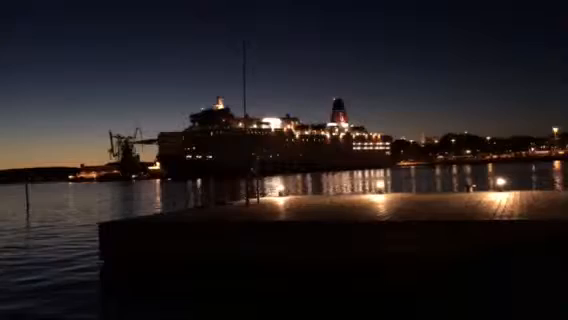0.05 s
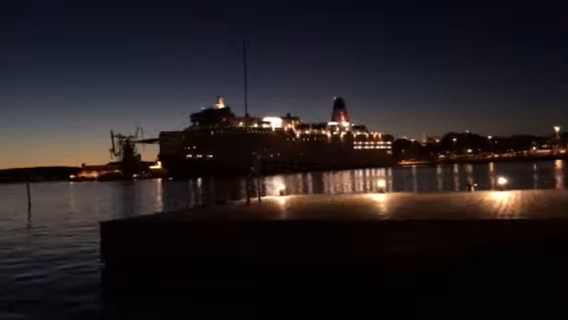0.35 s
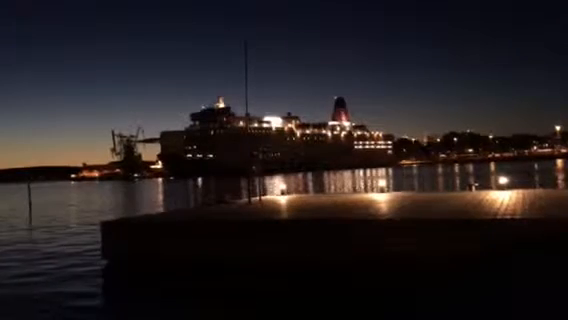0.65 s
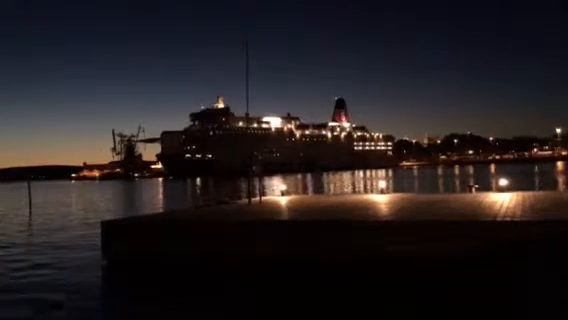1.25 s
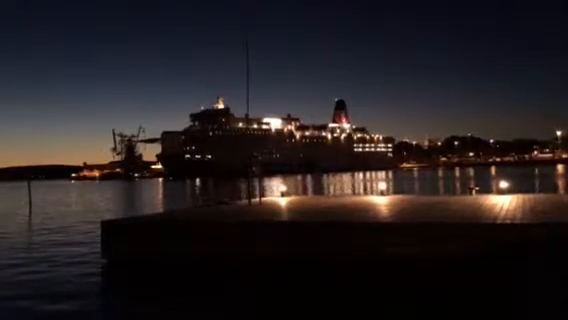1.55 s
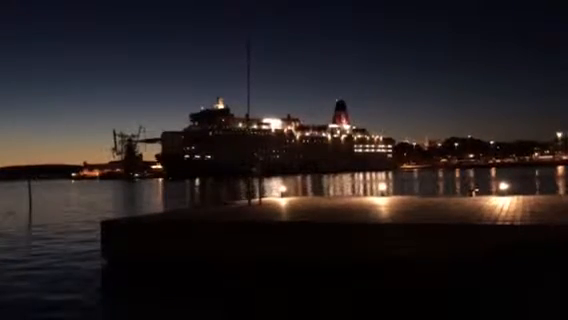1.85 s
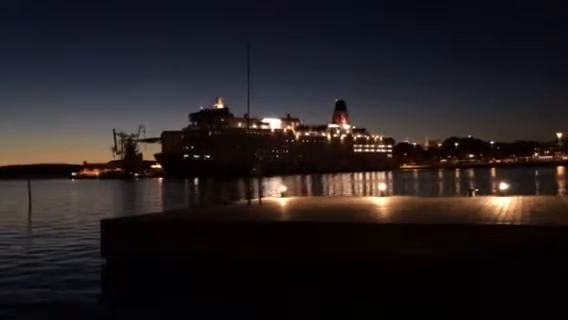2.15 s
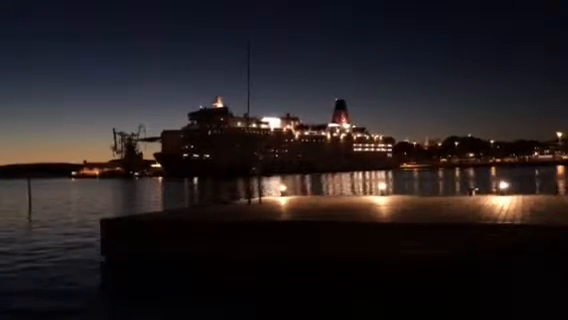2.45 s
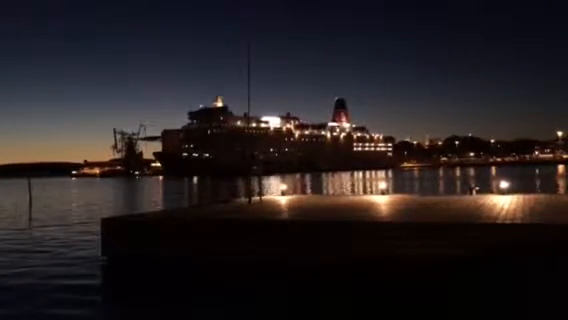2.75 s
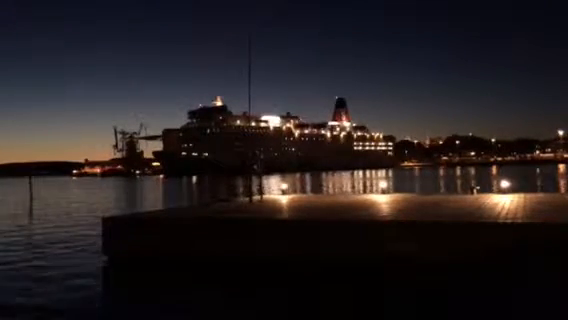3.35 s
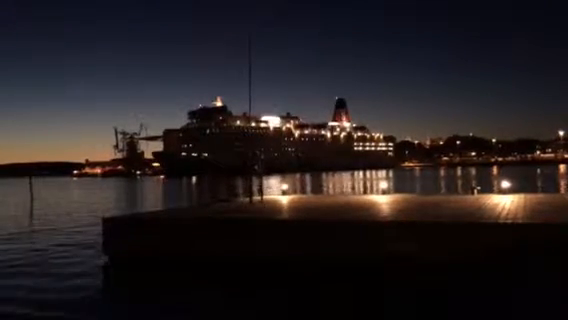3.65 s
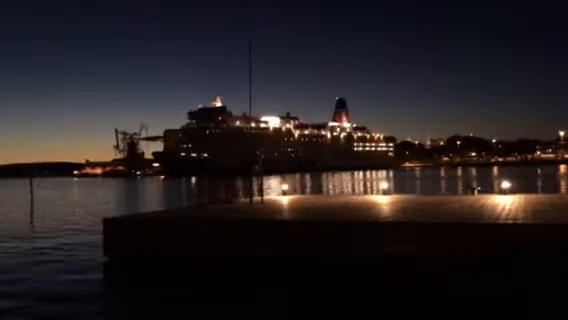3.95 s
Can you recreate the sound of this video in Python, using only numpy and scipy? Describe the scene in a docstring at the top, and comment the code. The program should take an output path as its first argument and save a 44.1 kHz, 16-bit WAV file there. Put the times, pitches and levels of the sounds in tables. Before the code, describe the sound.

An idling ship's engines rumble and pulse steadily across the harbor, picked up from the dockside. Behind them sit a distant ventilation roar and faint wavering whines, with a light wash of wind and water and a few tiny ticks nearby.

```python
"""Ferry idling in a night harbour

Heard from the quay, two diesels sound harmonics of their firing cycles, which beat against each
other over a throbbing exhaust rumble. Ventilation fans hum and machines whine in a distant roar.
An airy wash of breeze and water swells and sinks, with three tiny ticks nearby and microphone hiss."""
import sys
import numpy as np
from scipy import signal
from scipy.fft import irfft
from scipy.io import wavfile

SR = 44100
rng = np.random.default_rng(int(sys.argv[2]) if len(sys.argv) > 2 else 0)


def output_pcm(signal):
    """Save a mono or channel-first signal as 16-bit PCM at the path in sys.argv[1].

    Samples are clipped to [-1, 1] before scaling.
    """
    pcm = np.clip(np.atleast_2d(signal).T, -1, 1) * 32767
    wavfile.write(sys.argv[1], SR, np.round(pcm).astype(np.int16))


N = 176400


def amp(db):
    """Amplitude ratio: tenfold for every 20 dB."""
    return 10 ** (np.asarray(db) / 20)


def unit(x):
    """Normalisation to rms 1."""
    return x / np.sqrt(np.mean(x ** 2) + 1e-30)


def level(points):
    """Gain envelope, interpolated between points of time in seconds and level in dB."""
    return amp(np.interp(np.arange(N) / SR, *np.transpose(points)))


def noise(gain_at):
    """Random-phase synthesis: noise of rms 1 with the given amplitude spectrum."""
    hz = np.fft.rfftfreq(N, 1 / SR)
    return unit(irfft(gain_at(hz) * np.exp(2j * np.pi * rng.random(len(hz))), N))


def coloured(points):
    """Spectral shaping: noise of rms 1 from points of frequency in Hz and relative density in dB."""
    f, db = np.transpose(points)
    return noise(lambda hz: amp(np.interp(np.log(hz + 1), np.log(f + 1), db)))


def drift(rate_hz):
    """Low-pass noise: a slow random wander of rms 1."""
    return noise(lambda hz: (hz > 0) * np.exp(-(hz / rate_hz) ** 2))


def rotation(hz, wander, rate_hz):
    """Phase as the integral of a frequency that strays by the rms fraction `wander`."""
    return 2 * np.pi * np.cumsum(hz * (1 + wander * drift(rate_hz))) / SR


def tone(phase, order):
    """Harmonic of rms 1 at a whole multiple of the cycle rate."""
    return np.sqrt(2) * np.cos(order * phase + 2 * np.pi * rng.random())


def exhaust(phase, orders):
    """Harmonic series of periodic exhaust pulses, each partial fading slightly over the water."""
    fading_db = -0.5
    return sum(amp(db) * unit(tone(phase, order) * amp(fading_db * drift(rate_hz=1.3)))
               for order, db in orders.items())


def diesels():
    """Beating: close harmonics of a slow diesel and a faster generator, whose governors hunt slightly."""
    # Exhaust tones of each engine. Each entry: multiple of the cycle rate, level in dB.
    main_orders = {11: -54, 12: -50.5, 15: -55, 17: -52, 18: -48, 33: -57, 49: -61}
    generator_orders = {6: -60, 7: -49.5, 10: -48.5, 12: -47.5, 13: -48.5, 15: -58, 18: -56, 27: -56}
    # The slow diesel's strongest tone. Each row: time in seconds, level in dB.
    boom_level = [(0, -40), (.3, -37.5), (.55, -45), (.75, -47), (.9, -40), (1.2, -42), (1.4, -38),
                  (1.8, -37), (2.15, -37), (2.8, -38), (3.3, -40.5), (3.65, -44), (4, -52)]
    main = rotation(hz=4.035, wander=.0012, rate_hz=.53)
    generator = rotation(hz=6.3, wander=.0012, rate_hz=.53)
    boom = level(boom_level) * tone(main, order=13)
    return boom + exhaust(main, main_orders) + exhaust(generator, generator_orders)


def rumble():
    """Band-limited noise: a deep, steady exhaust rumble under a hollow, surging drone."""
    # Spectra of the two bands. Each row: frequency in Hz, relative density in dB.
    rumble_spectrum = [(10, -25), (24, -18), (33, -19), (42, -6), (56, 0), (76, 0), (87, -4.5), (110, -8),
                       (135, -16), (200, -42), (1500, -110)]
    drone_spectrum = [(40, -43), (75, -17.5), (92, -2), (110, 1), (132, -2), (153, -3), (180, -3.5),
                      (215, -8), (250, -19.5), (400, -29.5), (3000, -100)]
    # Their envelopes. Each row: time in seconds, level in dB.
    rumble_level = [(0, -43), (2.8, -43), (3.1, -42), (4, -42)]
    drone_level = [(0, -48), (.2, -40), (.45, -42.5), (.78, -41), (1.16, -44), (1.32, -41.5), (1.47, -42.5),
                   (1.63, -39), (1.88, -44), (2.12, -38), (2.42, -42), (2.63, -39.5), (2.9, -43.5),
                   (3.15, -40), (3.35, -40), (3.55, -41), (3.77, -38.5), (4, -40.5)]
    return level(rumble_level) * coloured(rumble_spectrum) + level(drone_level) * coloured(drone_spectrum)


def throbs():
    """Amplitude modulation: deep exhaust noise swells in short half-cosine pulses."""
    # Exhaust throbs. Each row: centre in seconds, length in seconds, level at the crest in dB.
    pulses = [(.04, .09, -37), (.155, .09, -33.5), (.27, .1, -36), (.365, .09, -36), (.59, .16, -35.5),
              (.795, .09, -34.5), (.88, .08, -33.5), (.99, .11, -34.5), (1.275, .08, -32.5),
              (1.33, .1, -33), (1.405, .07, -32.5), (1.52, .11, -35), (1.68, .11, -32.5), (1.9, .09, -35),
              (2.14, .12, -32), (2.34, .07, -33), (2.5, .09, -31.5), (2.78, .08, -37), (2.885, .1, -34),
              (3.255, .05, -31.5)]
    # Their spectrum. Each row: frequency in Hz, relative density in dB.
    spectrum = [(10, -45), (35, -25), (46, -6), (58, 0), (76, 0), (88, -7), (125, -16), (180, -24),
                (260, -48), (1500, -110)]
    out, exhaust_noise = np.zeros(N), coloured(spectrum)
    for centre, length, db in pulses:
        swell = np.cos(np.pi * np.clip((np.arange(N) / SR - centre) / length, -.5, .5))
        out += amp(db) * unit(swell * exhaust_noise) * np.sqrt(np.mean(swell ** 2))
    return out


def fans():
    """Narrow-band noise: ventilation fans hum as unsteady tones, and the blower's third harmonic hums
    unsteadily near 826 Hz."""
    # Spectral peaks. Each row: centre in Hz, half-width in Hz, level in dB.
    peaks = [(272, 6, -60.5), (294, 16, -59), (547, 7, -64), (826, 3, -66.5)]
    return sum(amp(db) * noise(lambda hz: 1 / (1 + ((hz - centre) / width) ** 2))
               for centre, width, db in peaks)


def blower():
    """Blade-passing tone: one blower whines cleanly at its blade rate and the octave above."""
    # Levels of the first two harmonics in dB, before the swell.
    harmonics_db = [-58, -57.5]
    # Swell of the whine. Each row: time in seconds, gain in dB.
    swell = [(0, -3), (.2, -14), (.36, -1), (.55, -3), (.87, 3), (1.04, -3), (1.27, 1), (1.6, -1),
             (1.8, -9), (3.2, -12), (4, -8)]
    blades = rotation(hz=270.8, wander=.004, rate_hz=2.85)
    return level(swell) * sum(amp(db) * tone(blades, k + 1) for k, db in enumerate(harmonics_db))


def whines():
    """Frequency modulation and fading: far-off machines waver, coming and going with the air."""
    # Machine tones. Each row: frequency in Hz, level in dB.
    machines = [(590, -64.5), (632, -62.5), (672, -65), (715, -66), (885, -65), (945, -65.5), (1015, -66.5)]
    out, fading_db = np.zeros(N), 5
    for hz, db in machines:
        whine = tone(rotation(hz, wander=.013, rate_hz=3.01), order=1)
        fading = amp(fading_db * np.tanh(drift(rate_hz=4.5)))
        out += amp(db) * unit(whine * fading)
    return out


def roar():
    """Incoherent sources: distant ventilation and the town merge into broadband noise."""
    # Spectrum of the roar. Each row: frequency in Hz, relative density in dB.
    spectrum = [(30, -41), (240, -5.5), (330, -0.5), (410, -4), (490, -3.5), (570, -0.9), (660, -0.8),
                (780, -1.5), (900, -3.5), (1020, -2), (1150, -4.5), (1350, -9.5), (1750, -14.5),
                (2600, -24), (5000, -46.5)]
    # Its envelope. Each row: time in seconds, level in dB.
    envelope = [(0, -48.5), (.15, -50.5), (.38, -48.5), (.5, -50.5), (.8, -49.5), (.92, -51), (1.25, -49),
                (1.4, -50.3), (1.58, -49), (1.9, -48.5), (2.45, -49.5), (3.05, -49.5), (3.4, -49),
                (4, -49.5)]
    waver_db = .17 * drift(rate_hz=1.3)
    return level(envelope) * coloured(spectrum) * amp(waver_db)


def wash():
    """Slowly modulated noise: a soft wash of breeze and water swells and sinks."""
    # Spectrum of the wash. Each row: frequency in Hz, relative density in dB.
    spectrum = [(200, -15), (1000, -2.5), (1650, 2), (1770, -0.5), (1900, 5), (2250, -0.5), (2550, -1),
                (2850, -5.5), (3270, -7.5), (3480, -7), (4000, -16), (4500, -19), (4950, -27),
                (5800, -21.5), (7500, -36), (16000, -73)]
    # Its envelope. Each row: time in seconds, level in dB.
    envelope = [(0, -64), (.22, -64), (.38, -61), (.52, -61.8), (.78, -59.7), (.95, -61.8), (1.04, -60.5),
                (1.45, -62.3), (1.75, -60.5), (1.92, -57.7), (2.08, -59.3), (2.42, -58.5), (2.68, -60.7),
                (2.78, -64.3), (3.08, -63.8), (3.2, -61), (3.35, -62.3), (3.68, -62.3), (3.8, -60),
                (4, -59.7)]
    flutter_db = .3 * drift(rate_hz=8)
    return level(envelope) * coloured(spectrum) * amp(flutter_db)


def ticks():
    """Damped transients: tiny close clicks, one with the clear ringing ping of a drip."""
    # Each row: start in seconds, click peak in dB, centre in Hz, bandwidth in Hz, ping level in dB.
    events = [(.627, -65, 7200, 2000, -80), (2.142, -58, 6600, 2400, -80), (2.390, -57, 6200, 6400, -54)]
    click_decay_s, ping_hz, ping_decay_s = .0007, 3200, .003
    out, t = np.zeros(N), np.arange(400) / SR
    ping = np.sin(2 * np.pi * ping_hz * t) * np.exp(-t / ping_decay_s)
    for start, db, centre, width, ping_db in events:
        band = signal.butter(2, [centre - width / 2, centre + width / 2], "band", fs=SR, output="sos")
        click = signal.sosfilt(band, rng.standard_normal(len(t)) * np.exp(-t / click_decay_s))
        out[round(start * SR):][:len(t)] += amp(db) * click / abs(click).max() + amp(ping_db) * ping
    return out


def scene():
    """Superposition: the harbour's sources add at one microphone."""
    ferry = diesels() + rumble() + throbs() + fans() + blower()
    return (ferry + whines() + roar() + wash() + ticks())[None]


def record(dry):
    """Self-noise and bandwidth: the microphone adds hiss, then a steep low-pass cuts the top treble."""
    # Spectrum of the hiss. Each row: frequency in Hz, relative density in dB.
    hiss_spectrum = [(100, -6), (6500, -5.4), (7700, -7.3), (8900, -3.8), (9850, -3.2), (10400, -8.5),
                     (11200, -1.6), (15700, 0)]
    hiss_db, cutoff_hz = -76.7, 15800
    lowpass = signal.ellip(14, .01, 60, cutoff_hz, fs=SR, output="sos")
    return signal.sosfiltfilt(lowpass, dry + amp(hiss_db) * coloured(hiss_spectrum))


dry = scene()
out = record(dry)
output_pcm(out)
```